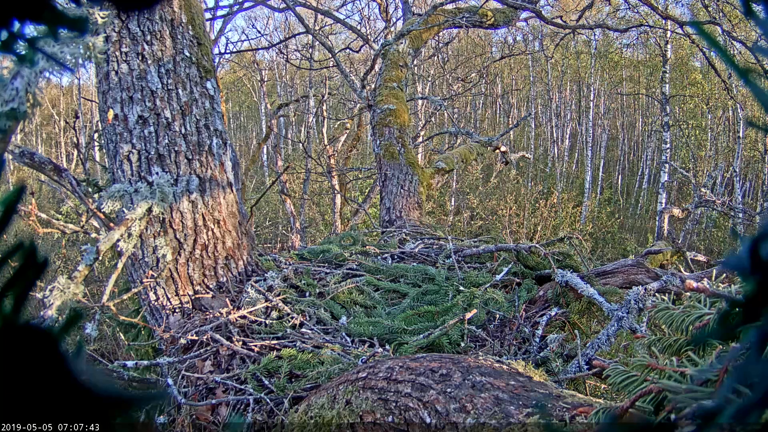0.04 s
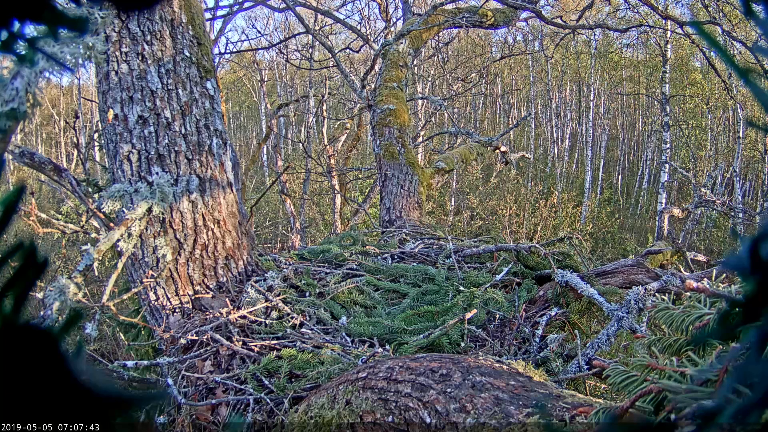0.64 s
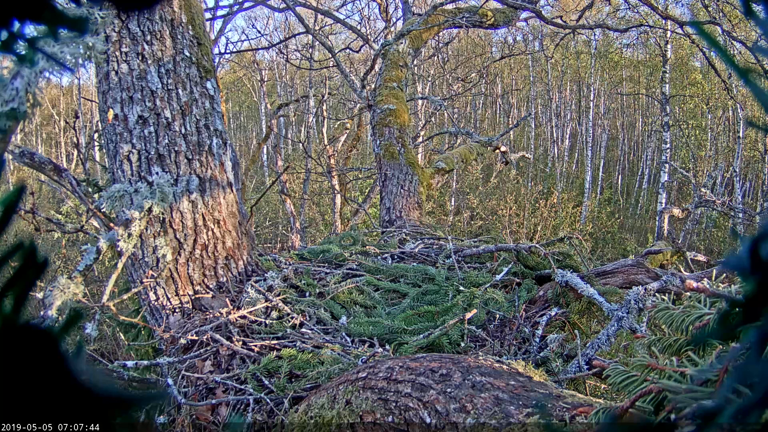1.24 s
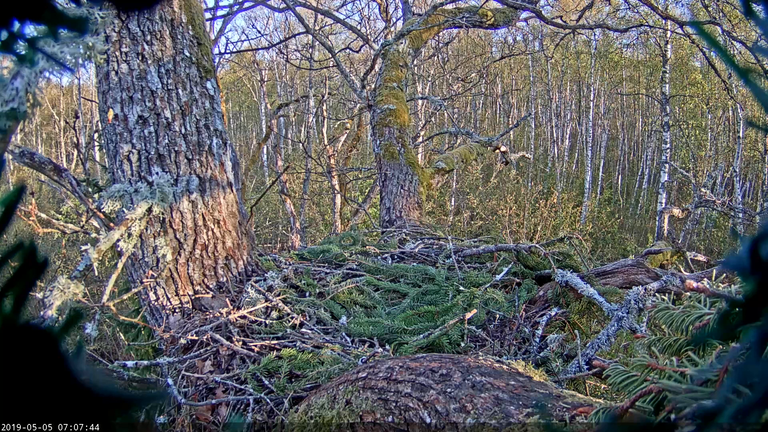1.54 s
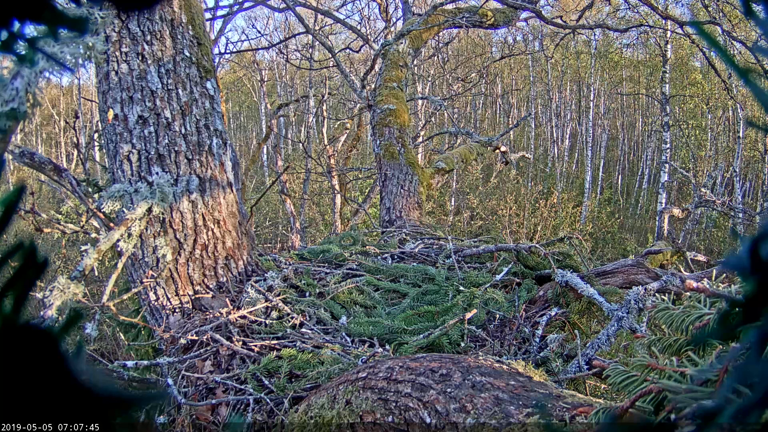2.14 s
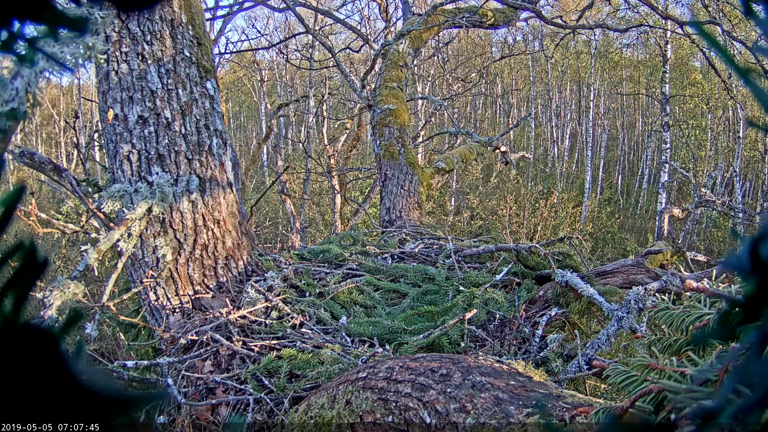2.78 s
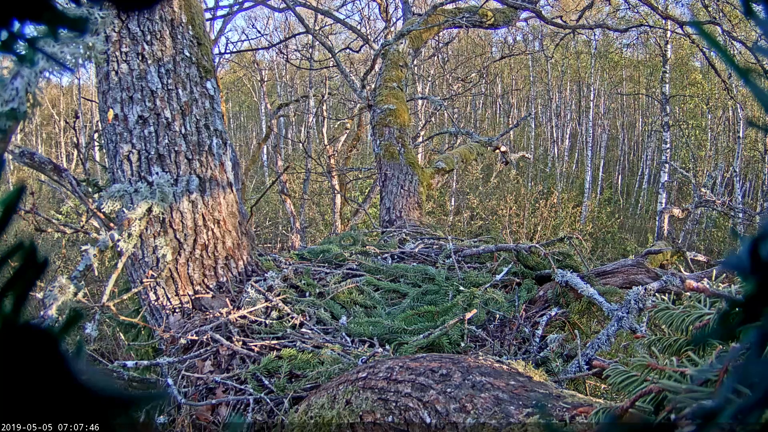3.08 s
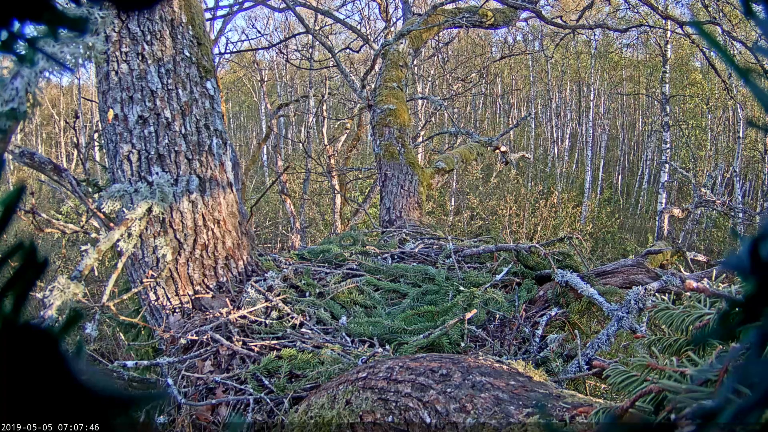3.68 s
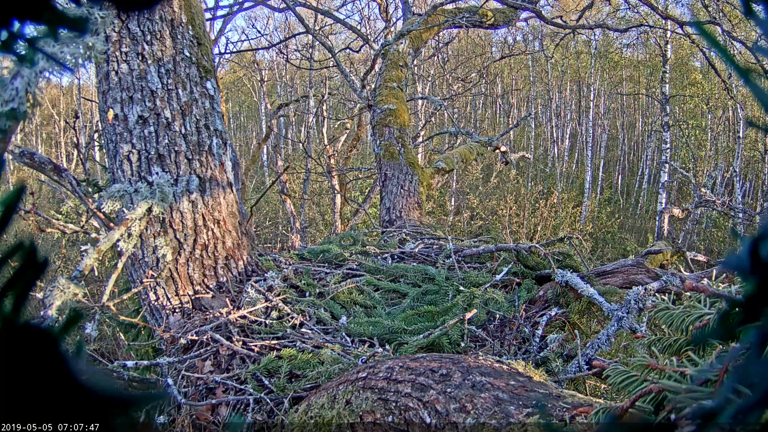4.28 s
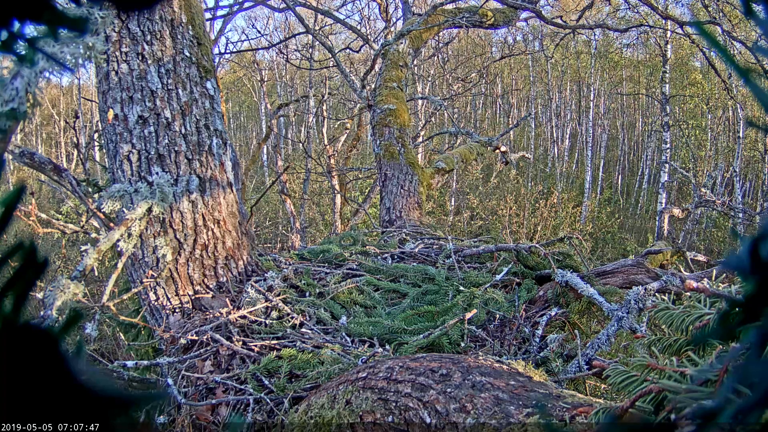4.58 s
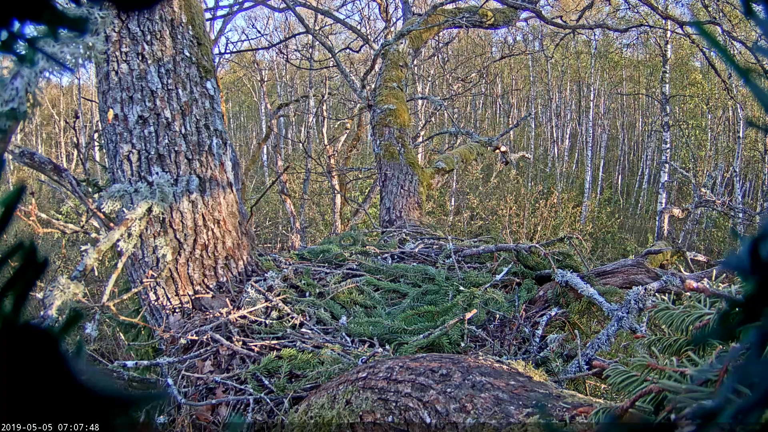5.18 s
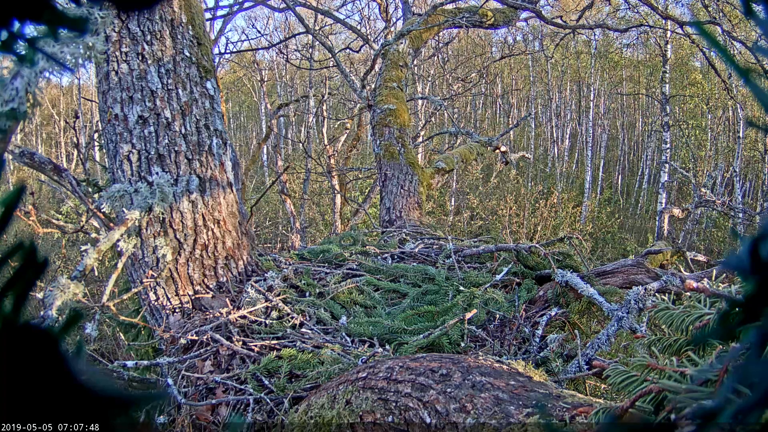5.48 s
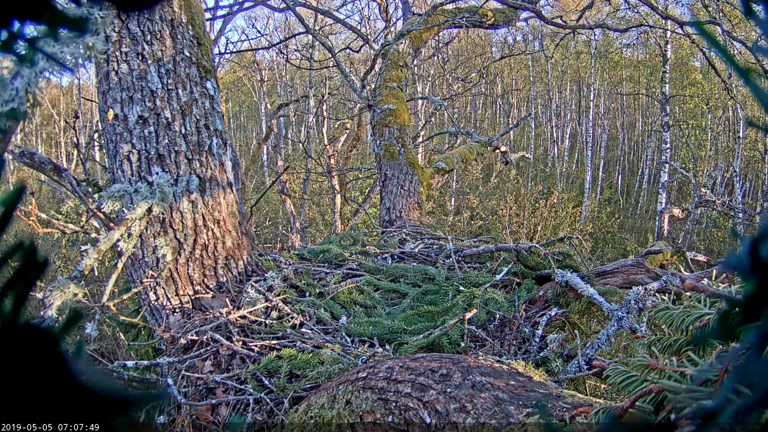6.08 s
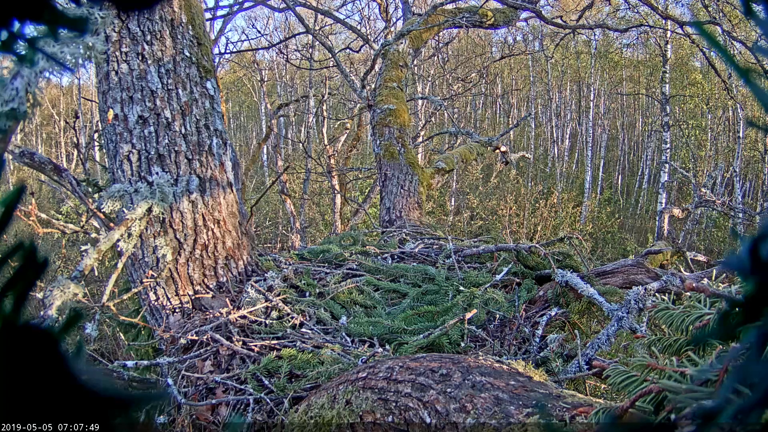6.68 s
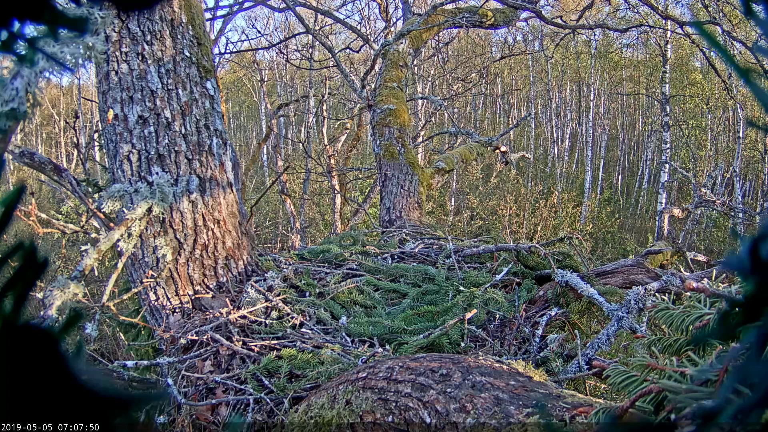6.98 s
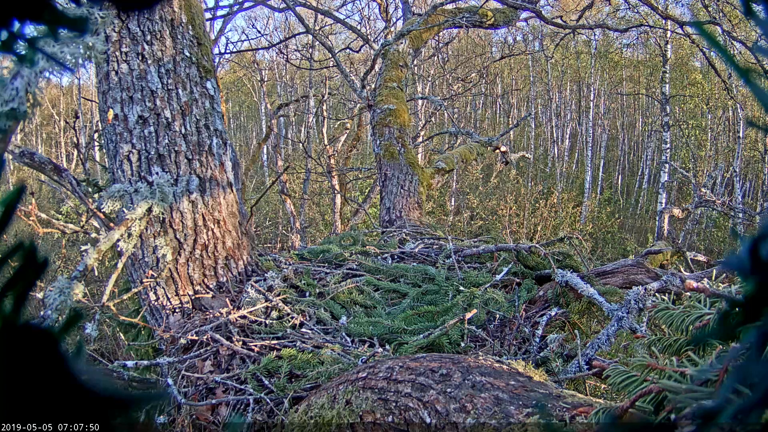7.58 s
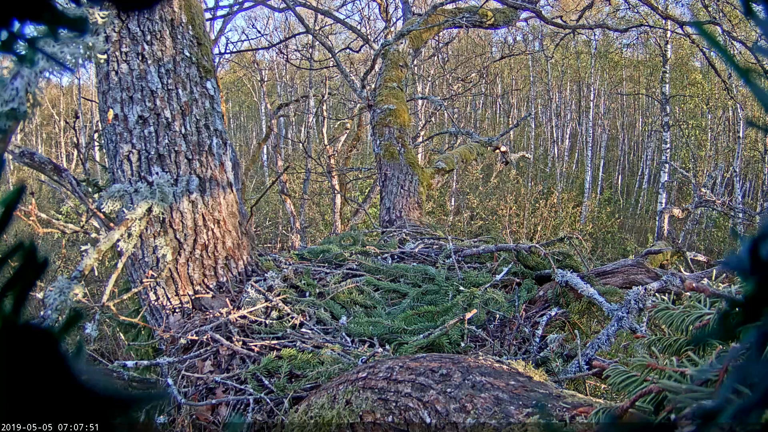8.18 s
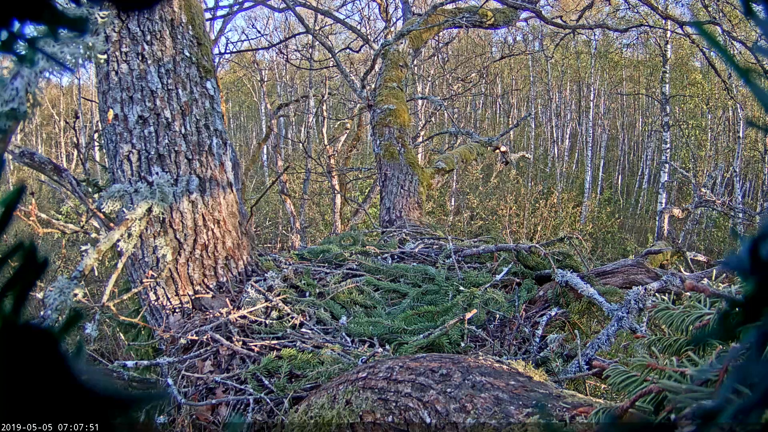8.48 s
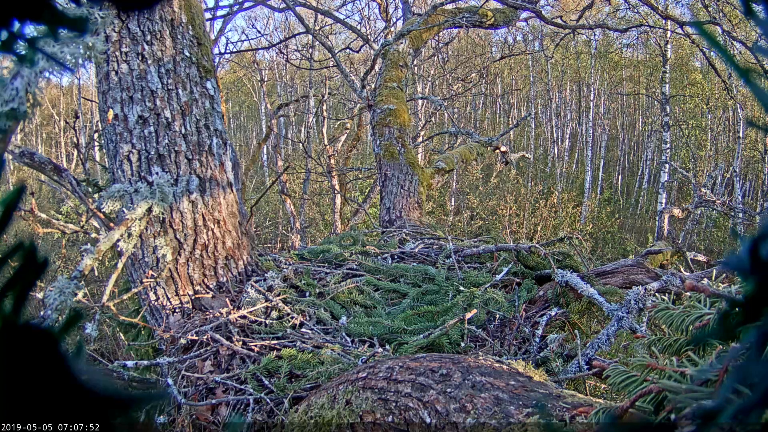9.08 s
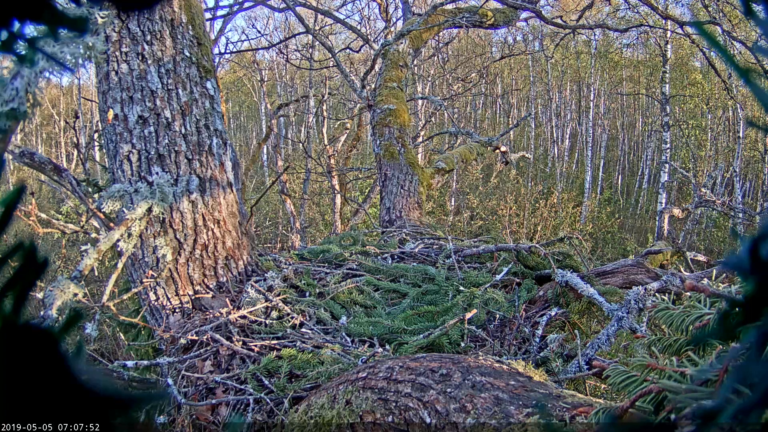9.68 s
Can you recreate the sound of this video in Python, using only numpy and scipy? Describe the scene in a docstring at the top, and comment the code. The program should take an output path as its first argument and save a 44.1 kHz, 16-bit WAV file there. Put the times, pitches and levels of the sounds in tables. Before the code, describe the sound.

An eagle calls close to a microphone at its nest, about fourteen short, hoarse screams in a steady series. The first two are faint, the rest much louder. Each rises from a small croak and whistle into a harsh, raspy scream, then sinks away and rings through the forest. Soft squeaks follow many calls, songbirds chirp farther off, and a twig ticks once or twice.

```python
"""An eagle is already screaming close to a nest microphone, and the forest rings after each hoarse call.
Each new call starts with a croak and a rising whistle, breaks into the harsh scream of a vibrating
membrane, sinks back to a whistle and goes slack, all over a rasp of air in the throat.
A soft squeak follows most calls. Now and then songbirds sing farther off and a twig ticks in the nest.
The eagle's voice cracks more in the last calls."""
import sys
import numpy as np
from scipy import signal
from scipy.fft import rfft, irfft, next_fast_len
from scipy.io import wavfile
from scipy.ndimage import map_coordinates

SR = 44100
rng = np.random.default_rng(int(sys.argv[2]) if len(sys.argv) > 2 else 0)


def store_pcm(level_fs):
    """Save levels as 16-bit WAV."""
    pcm = np.round(np.clip(level_fs, -1, 1) * 32767).astype(np.int16)
    wavfile.write(sys.argv[1], SR, np.atleast_2d(pcm).T)


N = 438345
TIME = np.arange(N) / SR

# The eagle's calls. Each row: start, length, time until the voice catches, time until it breaks into
# the scream and length of the slack ending, all in seconds, then whistle, rasp and croak faders in dB.
CALLS = [ (-.3, 0.53, .03, .08, 0.14, -46, -56.5, -54), (.305, 0.33, 0.04, 0.09, 0.11, -50, -60, -52),
         (0.952, 0.57, 0.00091, .064, 0.1, -39, -49.5, -68),
         (1.804, .65, 0.034, 0.11, 0.072, -43.5, -48.5, -57),
         (2.661, 0.51, 0.038, 0.12, 0.059, -41.5, -47.5, -58),
         (3.43, 0.5, 0.00086, 0.077, .135, -37, -48.5, -61),
         (4.175, 0.46, 0.029, 0.12, 0.06, -46.5, -50, -48),
         (4.804, 0.49, .04, 0.13, 0.073, -42.5, -48.5, -52),
         (5.514, 0.48, 0.038, 0.12, 0.047, -40.5, -47, -51),
         (6.24, .49, 0.045, 0.15, 0.055, -43.5, -45.5, -47.5),
         (7.003, 0.79, .06, 0.2, 0.07, -45.5, -48, -48.5),
         (8.031, .505, .032, 0.13, 0.073, -37.5, -47.5, -47.5),
         (8.792, 0.45, .056, .16, 0.044, -39, -45.5, -48.5),
         (9.525, 0.61, 0.047, 0.21, 0.068, -38.5, -45, -48.5)]
# The throat's resonances. Each row: frequency in Hz, relative level in dB.
THROAT_EQ = [(120, -34), (260, -13.5), (450, 0.5), (850, -1), (1040, 0), (1150, -34), (1260, 10),
             (1500, 12.5), (1680, 5.5), (1880, -1), (2200, 12.5), (2900, -1), (3250, 6.5), (4000, -45)]


def screams(fade_db=16.5, brighten_db=9, dull_ends_db=4.5, shimmer_db=1.78):
    """A membrane near 1.3 kHz whose even harmonics the throat favours; it swells, brightens and fades."""
    # Each row: start and end in seconds, first, middle and last pitch in Hz, fader in dB, place of the
    # crest from 0 to 1, swell up to it in dB, trims for the 4th and for the low odd harmonics in dB.
    cues = [ (-.1, 0.123, 1258, 1258, 1188, -42.5, 0.51, 6.4, 0.5, -2.5),
            (.37, .53, 1258, 1237, 1240, -55, .5, 7.4, 0.5, -2),
            (1.011, 1.463, 1327, 1298, 1235, -38, 0.18, 12, 2.5, 2),
            (1.889, 2.346, 1332, 1323, 1276, -31, 0.29, 11.6, -1.5, -1.5),
            (2.762, 3.103, 1321, 1280, 1258, -34, 0.34, 6.9, 2, -2.5),
            (3.503, 3.83, 1334, 1321, 1298, -34, 0.36, 7.4, 3, 0),
            (4.26, 4.573, 1351, 1329, 1302, -35.5, 0.4, 15.7, 4, 1),
            (4.908, 5.236, 1337, 1294, 1257, -32.5, 0.31, 10.6, 0.5, -5),
            (5.625, 5.941, 1340, 1298, 1208, -31.5, 0.37, 11.7, 0, -7.5),
            (6.353, 6.687, 1285, 1269, 1228, -28.5, 0.38, 24.4, 0, -5.5),
            (7.116, 7.494, 1268, 1331, 1274, -34.5, 0.67, 9.3, 0.5, 0.5),
            (8.172, 8.433, 1284, 1254, 1249, -40.5, 0.4, 8.4, 1.5, -9),
            (8.941, 9.18, 1266, 1263, 1218, -36.5, 0.72, 4, 0.5, -7.5),
            (9.709, 9.996, 1238, 1229, 1210, -37, 0.13, 1.8, 6, -10.5)]
    # The harsh top. Each row: harmonic number, relative level in dB.
    overtones = [(5, -13), (6, -12), (7, -25.5), (8, -35.5), (9, -37.5), (10, -43)]
    # The voice cracks more late on. Each row: time in seconds, depth of the stutter in dB.
    cracking = [(7.5, 1), (8.2, 4), (9.0, 2.5), (9.9, 3)]
    out = np.zeros(N)
    waver = 1 + .003 * wobble(500) + .0025 * wobble(70) + .0015 * wobble(25)
    flutter_db = shimmer_db * wobble(160) + np.interp(TIME, *np.transpose(cracking)) * wobble(90)
    scatter = wobble(500)  # uneven cycles give each harmonic a noisy skirt
    stumble = .48 * wobble(220)  # the odd harmonics are the least steady
    sputter = amp(.93 * wobble(110))  # the top flickers
    fray = .1 * wobble(400)
    for start, end, first_hz, middle_hz, last_hz, peak_db, crest, swell_db, fourth_db, odd_db in cues:
        span, gate, u = note(start, end, fade=.016)
        off_crest = np.interp(u, [0, crest, 1], [1, 0, 1]) ** 1.27
        db = peak_db - off_crest * np.where(u < crest, swell_db, fade_db)
        bright_db = fourth_db + brighten_db * (u - .5) + dull_ends_db * (arch(u) - .5)
        # The loudest moments are the purest: steadier phase, weaker odd harmonics.
        rough_radians = np.interp(db, [-44, -32], [.18, .07])
        odd_gain = amp(odd_db + np.clip((-38 - db) / 2, -4, 4))
        hz = glide(u, first_hz, middle_hz, last_hz) * waver[span]
        phase = phase_of(hz) + rough_radians * scatter[span]
        even = np.sin(2 * phase) + amp(bright_db) * np.sin(4 * phase)
        odd = amp(-10) * np.sin(phase + stumble[span]) + amp(-8) * np.sin(3 * phase + stumble[span])
        top = sum(amp(level) * np.sin(k * (phase + fray[span])) for k, level in overtones)
        tone = even + odd_gain * odd + amp(bright_db / 2 - 2) * sputter[span] * top
        out[span] += np.sqrt(2) * gate * amp(db - 1 + flutter_db[span]) * tone
    return out


def opening_whistles(swell_db=7.5, dull_db=8.5):
    """The other side of the syrinx starts faintly, catches and sweeps up roughly into the scream."""
    # The sweep: pitch in Hz at the start, as the voice catches, midway up and at the break.
    sweep_hz = (1420, 1890, 2120, 2255)
    out = np.zeros(N)
    waver, scatter = 1 + .004 * wobble(300), .24 * wobble(600)
    flutter_db = 2 * wobble(140)
    for start, _, catch, rise, _, db, _, _ in CALLS:
        span, gate, u = note(start, start + rise, fade=.008)
        age = u * rise
        hz = np.interp(age, [0, catch, (catch + rise) / 2, rise], sweep_hz)
        climb = np.clip((age - catch) / (rise - catch), 0, 1)
        held = held_back(age, catch)
        phase = phase_of(hz * waver[span]) + scatter[span]
        tone = whistle_tone(phase, octave_db=7 - dull_db * climb - 14 * held)
        envelope_db = db - 2.5 + swell_db * (climb - .5) - 4 * held
        out[span] += gate * amp(envelope_db + flutter_db[span]) * tone
    return out


def closing_whistles(swell_db=6, dull_db=8.5):
    """The whistle comes back clearer as the scream tires, mostly sinking, and grows duller."""
    # Each row: start and end in seconds, first, middle and last pitch in Hz, fader and octave trim in dB.
    cues = [ (0, 0.089, 2140, 2064, 2072, -38.5, -8), (0.439, 0.538, 2110, 2078, 2045, -46.5, -5),
            (1.35, 1.469, 2117, 2038, 2110, -43, -16), (2.25, 2.406, 2205, 2157, 2050, -40.5, 2),
            (3.03, 3.129, 2100, 2140, 2110, -37, -3), (3.79, 3.846, 2150, 2080, 2060, -40, 0),
            (4.49, 4.611, 2236, 2132, 2107, -37.5, -1.5), (5.187, 5.258, 2136, 2066, 2060, -44, -1.5),
            (5.87, 5.964, 2230, 2080, 2066, -32.5, -3.5), (6.629, 6.698, 2255, 2059, 1990, -32, 0.5),
            (7.486, 7.757, 2124, 2077, 2064, -32, -6), (8.133, 8.34, 2173, 2241, 2160, -43.5, 7.5),
            (8.327, 8.46, 2215, 2089, 2078, -32.5, -5), (9.157, 9.221, 2186, 2070, 2070, -31.5, -1.5),
            (9.87, 9.948, 2180, 2130, 2260, -38, -12)]
    out = np.zeros(N)
    waver, scatter = 1 + .004 * wobble(300), .14 * wobble(600)
    flutter_db = 2 * wobble(140)
    for start, end, first_hz, middle_hz, last_hz, db, bright_db in cues:
        span, gate, u = note(start, end, fade=.0096)
        phase = phase_of(glide(u, first_hz, middle_hz, last_hz) * waver[span]) + scatter[span]
        tone = whistle_tone(phase, octave_db=bright_db - 4 - dull_db * (u - .5))
        out[span] += gate * amp(db + 1 + swell_db * (arch(u) - 1) + flutter_db[span]) * tone
    return out


def whistle_tone(phase, octave_db):
    """A whistle with an adjustable octave and faint 3rd and 4th harmonics."""
    core = np.sin(phase) + amp(octave_db) * np.sin(2 * phase)
    return core + amp(-17) * np.sin(3 * phase) + amp(-28) * np.sin(4 * phase)


def rasp(opening_db=6, throat_dip_db=2.5, close_s=.067):
    """Turbulent air: the throat eases mid-call; the beak's hiss jumps at the catch and dies first."""
    # The hiss at the beak. Each row: frequency in Hz, relative level in dB.
    hiss_eq = [(2400, -29.5), (3250, -2.5), (3600, 6.5), (4600, 8), (5300, 9), (5800, 6.5), (6500, -3),
               (7100, 0.5), (7900, -2.5), (8700, -12), (9400, -14.5), (10200, -23), (11600, -23.5),
               (14000, -42)]
    out = np.zeros(N)
    throat, hiss = noise(THROAT_EQ), noise(hiss_eq)
    flutter = amp(3 * wobble(250) + wobble(22))
    for start, length, catch, rise, _, _, db, _ in CALLS:
        span, gate, u = note(start, start + length, fade=.008)
        age = u * length
        attack_db = -20 * held_back(age, catch) - opening_db * np.maximum(1 - age / rise, 0)
        effort_db = db + attack_db + .5 * arch(u) ** 2
        hiss_gain = np.clip((length - age) / close_s, 0, 1) * amp(effort_db + 1)
        throat_gain = amp(-47 + .31 * (effort_db + 42) - throat_dip_db * arch(u))
        out[span] += gate * (throat_gain * throat[span] + hiss_gain * hiss[span])
    return out * flutter


def held_back(age, catch):
    """1 until the voice catches, 0 after; the longer the wait, the softer the change."""
    crossfade_s = .008 + .35 * catch
    return 1 - np.clip((age - catch) / crossfade_s + .5, 0, 1)


def slackening(level_db=-48, fade_db=11.5, full_drop_s=.1):
    """The membrane lets go as a call ends: the pitch drops away and little but the root is left."""
    # The full drop: first, middle and last pitch in Hz.
    drop_hz = (1244, 1033, 485)
    out = np.zeros(N)
    waver = 1 + .008 * wobble(400)
    flutter_db = 2 * wobble(160)
    for start, length, _, _, slack, *_ in CALLS:
        span, gate, u = note(start + length - slack, start + length, fade=.016)
        reach = min(slack / full_drop_s, 1)  # a short ending stops partway down
        phase = phase_of(glide(u * reach, *drop_hz) * waver[span])
        tone = np.sin(phase) + amp(-11) * np.sin(2 * phase) + amp(-12) * np.sin(3 * phase)
        out[span] += gate * amp(level_db - fade_db * u + flutter_db[span]) * tone
    return out


def croaks(length_s=.032, first_hz=250, last_hz=480):
    """A few quickening pulses ring the throat as a call begins."""
    out = np.zeros(N)
    waver = 1 + .05 * wobble(300)
    for start, *_, db in CALLS:
        if start > 0:
            span, gate, u = note(start, start + length_s, fade=.00673)
            hz = first_hz + (last_hz - first_hz) * u
            phase = phase_of(hz * waver[span])
            ring = sum(amp(along(THROAT_EQ, k * hz)) * np.sin(k * phase) for k in range(2, 7))
            buzz = amp(6) * np.sin(phase) + ring
            out[span] += gate * amp(db - 1) * buzz / buzz.std()
    return out


def squeaks():
    """Thin falling tones from the eagle between its calls."""
    # Each row: start and end in seconds, middle pitch in Hz, level in dB.
    cues = [(3.942, 4.018, 890, -67), (4.674, 4.778, 925, -67), (5.35, 5.484, 906, -66.5),
            (6.037, 6.156, 950, -69), (6.75, 6.864, 1010, -74), (7.949, 8.017, 1054, -66.5),
            (8.582, 8.747, 1058, -65.5), (9.327, 9.43, 1040, -66)]
    # The fall: first, middle and last pitch as ratios to the middle one.
    bend = (1.07, 1, .83)
    out = np.zeros(N)
    waver = 1 + .0074 * wobble(440)
    for start, end, hz, db in cues:
        span, gate, u = note(start, end, fade=.0125)
        out[span] += gate * amp(db) * np.sin(phase_of(hz * glide(u, *bend) * waver[span]))
    return out


def twigs():
    """Twigs tick and the nest shifts with soft bumps: fast-dying bursts of noise."""
    # Each row: start in seconds, level in dB, centre frequency in Hz, seconds to die away by 60 dB.
    ticks = [(.81, -71, 120, .15), (0.919, -70, 114, 0.23), (2.58, -44, 890, 0.012),
             (2.585, -61.5, 119, .12), (4.13, -54, 4940, .027)]
    out = np.zeros(N)
    for start, db, hz, t60 in ticks:
        age = np.maximum(TIME - start, 0)
        wood = noise([(hz / 8, -15), (hz, 0), (hz * 3, -30), (hz * 20, -70)])
        out += (age > 0) * amp(db - 60 * age / t60) * wood
    return out


def songbirds(swell_db=6):
    """Gliding notes from the trees around, each swelling towards its middle."""
    # Each row: start and end in seconds, first, middle and last pitch in Hz, fader in dB.
    cues = [ (0.935, .95, 3660, 3740, 3690, -40), (1.418, 1.482, 7450, 7960, 8300, -60),
            (1.575, 1.806, 8160, 8400, 8920, -63), (2.097, 2.164, 3250, 3690, 4060, -46),
            (2.482, 2.552, 5130, 5480, 5080, -46.5), (2.625, 2.665, 6800, 6350, 7200, -43.5),
            (2.673, 2.74, 7300, 7370, 7160, -54.5), (3.29, 3.33, 4600, 4700, 4400, -54.5),
            (3.326, 3.388, 3600, 3950, 4470, -46), (3.338, 3.414, 5100, 5970, 6220, -57.5),
            (6.225, 6.244, 4800, 3690, 3620, -45), (6.255, 6.3, 3800, 3600, 3460, -43.5),
            (6.876, 7.097, 8630, 8180, 8130, -63), (7.823, 7.902, 4500, 3830, 3600, -44),
            (7.92, 7.981, 5340, 5420, 5000, -47.5), (8.052, 8.103, 7150, 6320, 7200, -42),
            (8.28, 8.601, 7590, 7390, 7520, -52), (8.691, 8.753, 4800, 4630, 4400, -51.5),
            (8.735, 8.802, 3510, 3980, 4320, -43.5), (8.746, 8.809, 5140, 5940, 6020, -53.5),
            (9.266, 9.28, 5650, 5340, 5030, -34.5), (9.317, 9.34, 5950, 5400, 5040, -38.5),
            (9.387, 9.484, 3670, 3960, 3880, -46), (9.527, 9.539, 5600, 4650, 3230, -46)]
    out = np.zeros(N)
    waver = 1 + .008 * wobble(300)
    flutter_db = wobble(120)
    for start, end, first_hz, middle_hz, last_hz, db in cues:
        span, gate, u = note(start, end, fade=.013)
        phase = phase_of(glide(u, first_hz, middle_hz, last_hz) * waver[span])
        out[span] += gate * amp(db + 3 + swell_db * (arch(u) - 1) + flutter_db[span]) * np.sin(phase)
    return out


def forest_echo(x, tail_send_db, near_db, near_t60=.16, bloom_s=.019):
    """Nearby branches scatter the sound at once; the far trunks return a long tail."""
    # The tail's colour. Each row: frequency in Hz, relative level in dB.
    tail_eq = [(200, -32), (800, -12), (1400, -15), (2200, -0.5), (5000, 2.5), (8000, 5), (13000, -5)]
    # The tail's length. Each row: frequency in Hz, seconds to die away by 60 dB.
    tail_t60 = [(200, 0.28), (1000, 2.45), (2200, 0.98), (5000, 0.74), (8000, 0.52), (13000, 0.62)]
    hz, t, bands = signal.stft(rng.standard_normal(2 * SR), SR, nperseg=256)
    decay_db = along(tail_eq, hz)[:, None] - 60 * t / along(tail_t60, hz)[:, None]
    tail = signal.istft(bands * amp(decay_db) * (1 - np.exp(-t / bloom_s)), SR, nperseg=256)[1]
    near = rng.standard_normal(len(tail)) * amp(-60 * TIME[:len(tail)] / near_t60)
    trunks = amp(tail_send_db) / 2 * tail / np.linalg.norm(tail)
    branches = amp(near_db) * near / np.linalg.norm(near)
    return signal.fftconvolve(x, trunks + branches)[:N]


def still_air(level_db=-66):
    """A faint bed of forest air and microphone rumble."""
    # Each row: frequency in Hz, relative level in dB.
    air_eq = [(10, -1), (30, -5), (48, -9.5), (70, -26), (110, -31), (300, -27), (600, -31.5), (1200, -27),
              (3000, -35), (5000, -28), (7000, -38.5), (14000, -40)]
    return amp(level_db) * noise(air_eq)


def amp(db):
    """Decibels to gain."""
    return 10 ** (np.asarray(db) / 20)


def along(points, hz):
    """Read a curve of (Hz, value) points on a log frequency axis."""
    knots_hz, values = np.transpose(points)
    return np.interp(np.log(hz + 1), np.log(knots_hz + 1), values)


def filtered(x, response):
    """Equalise x with a gain given as a function of frequency."""
    size = next_fast_len(N + SR // 2)
    return irfft(rfft(x, size) * response(np.fft.rfftfreq(size, 1 / SR)), size)[:N]


def noise(eq):
    """Noise of rms 1, coloured by (Hz, dB) points."""
    x = filtered(rng.standard_normal(N), lambda hz: amp(along(eq, hz)))
    return x / x.std()


def wobble(rate):
    """A smooth random curve with `rate` knots a second."""
    return map_coordinates(rng.standard_normal(N // 4), [TIME * rate], mode="wrap")


def note(start, end, fade):
    """The samples that a note covers, its soft gate and its progress u from 0 to 1."""
    span = slice(max(int((start - fade / 2) * SR), 0), max(int((end + fade / 2) * SR), 0))
    t = TIME[span]
    ramp = np.clip(np.minimum(t - start, end - t) / fade + .5, 0, 1)
    return span, np.sin(ramp * np.pi / 2) ** 2, np.clip((t - start) / (end - start), 0, 1)


def phase_of(hz):
    """Running phase of a pitch curve."""
    return 2 * np.pi * np.cumsum(hz) / SR


def glide(u, first, middle, last):
    """A smooth bend through three pitches as u runs from 0 to 1."""
    return first + (last - first) * u + (2 * middle - first - last) * 2 * u * (1 - u)


def arch(u):
    """0 at both ends of a note, 1 in its middle."""
    return np.sin(np.pi * u)


def scene():
    """The eagle up front and the songbirds with more echo, in one forest, in mono."""
    voice = croaks() + opening_whistles() + screams() + closing_whistles() + slackening()
    nest = voice + rasp() + squeaks() + twigs()
    song = songbirds()
    air = still_air()
    nest_echo = forest_echo(nest, tail_send_db=-5, near_db=-4)
    song_echo = forest_echo(song, tail_send_db=-2, near_db=-6)
    return (nest + nest_echo + song + song_echo + air)[None]


def record(dry):
    """The microphone keeps nothing above its band limit; its amplifier adds a small steady offset."""
    top_hz, offset = 13950, .0033
    return filtered(dry[0], lambda hz: hz < top_hz)[None] + offset


dry = scene()
out = record(dry)
store_pcm(out)
```